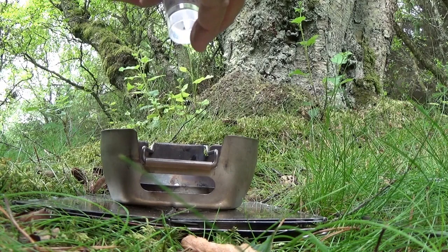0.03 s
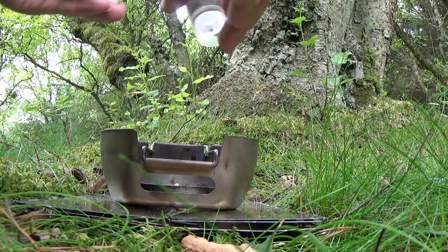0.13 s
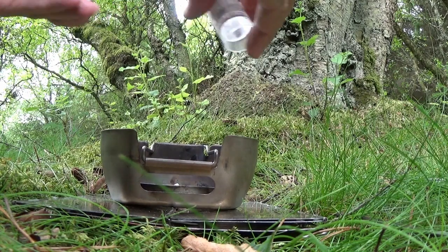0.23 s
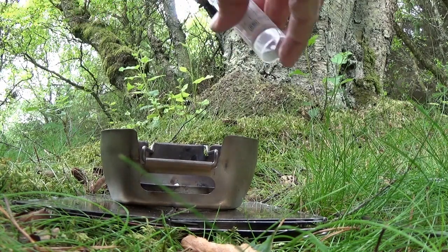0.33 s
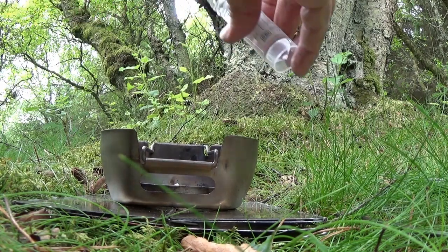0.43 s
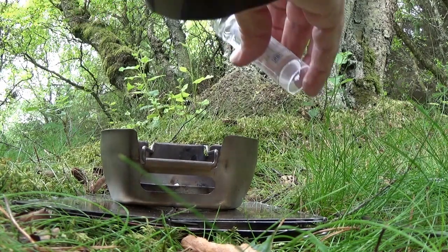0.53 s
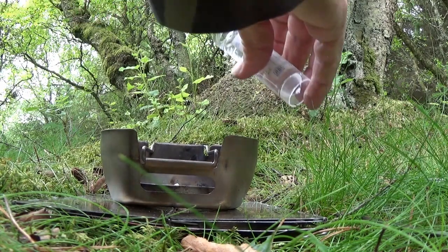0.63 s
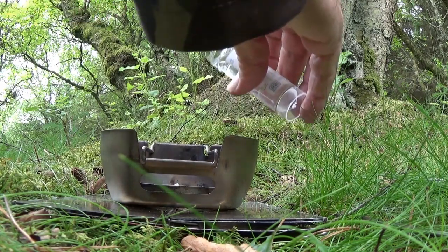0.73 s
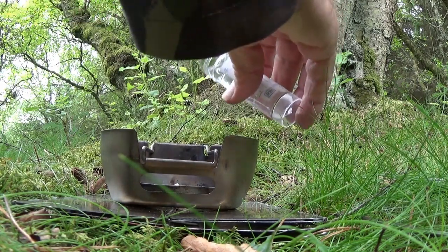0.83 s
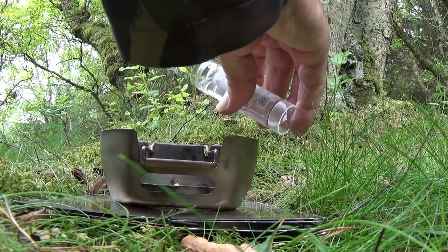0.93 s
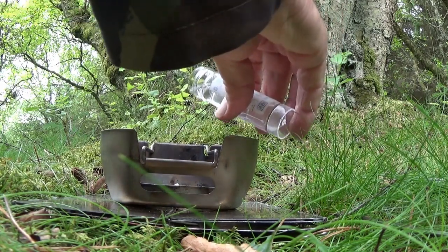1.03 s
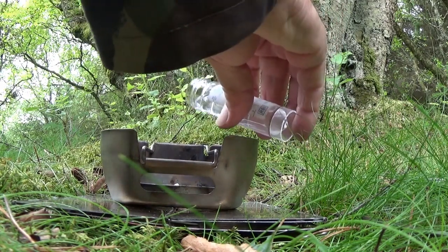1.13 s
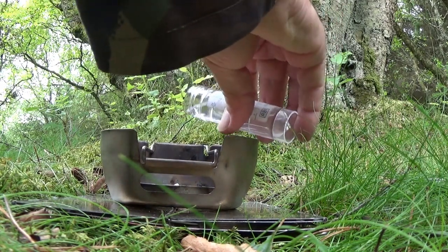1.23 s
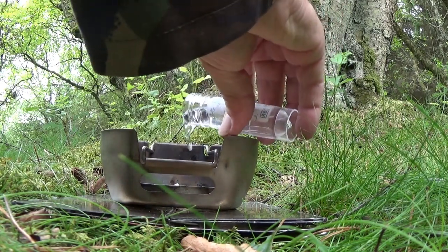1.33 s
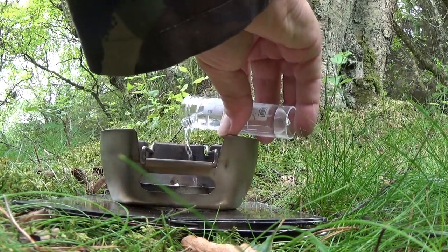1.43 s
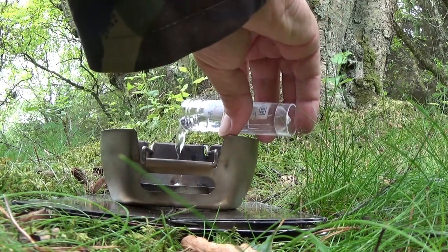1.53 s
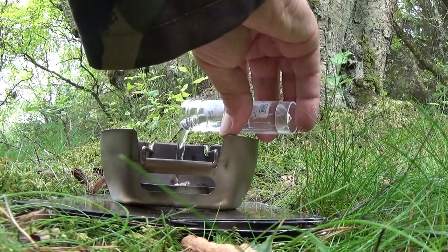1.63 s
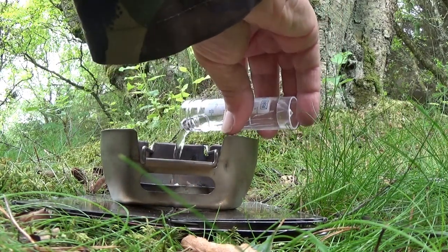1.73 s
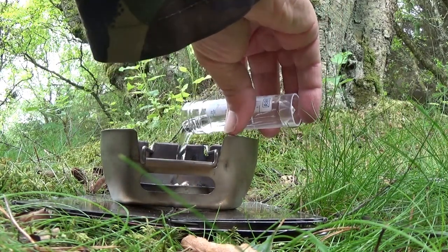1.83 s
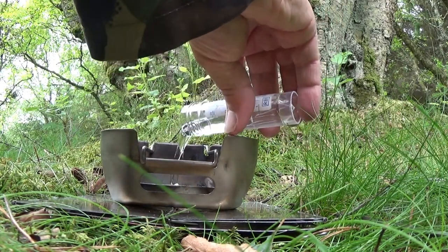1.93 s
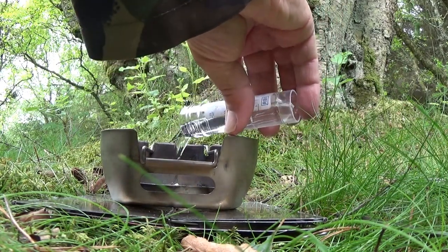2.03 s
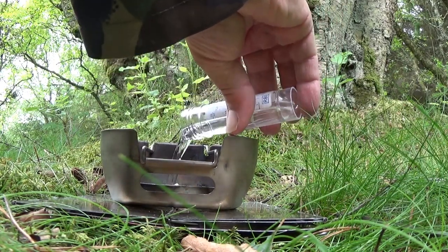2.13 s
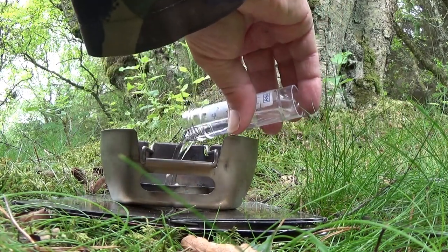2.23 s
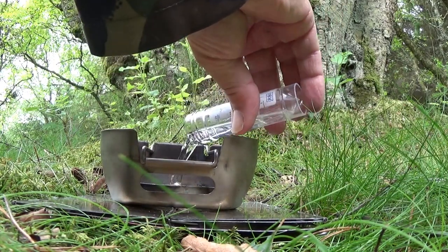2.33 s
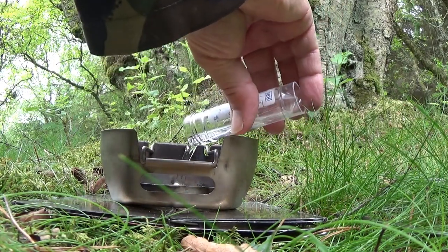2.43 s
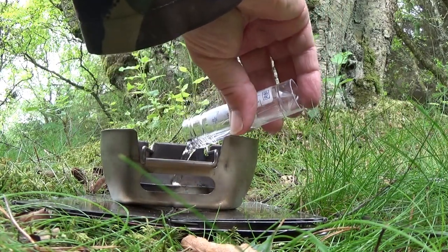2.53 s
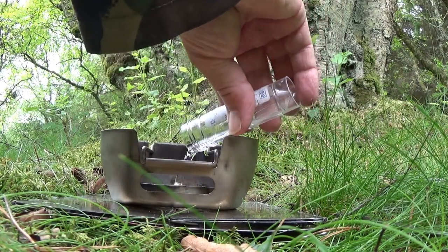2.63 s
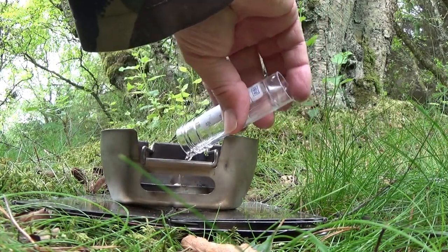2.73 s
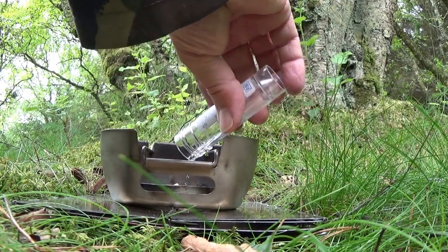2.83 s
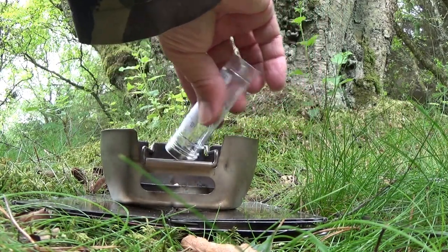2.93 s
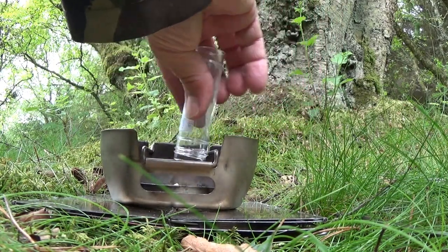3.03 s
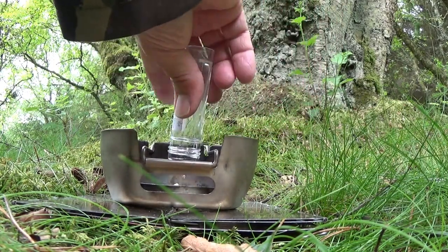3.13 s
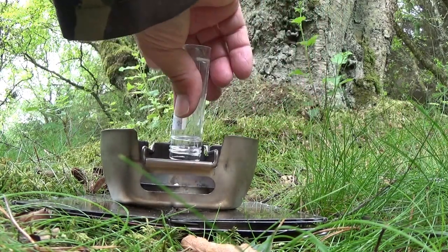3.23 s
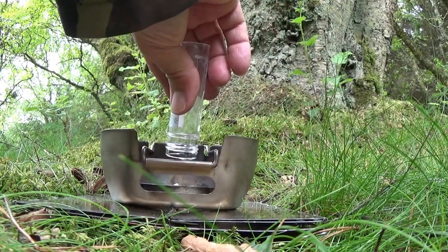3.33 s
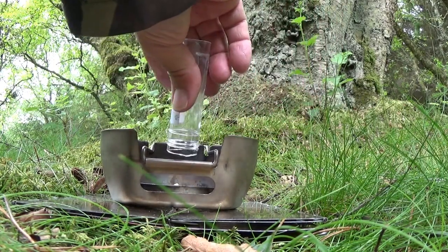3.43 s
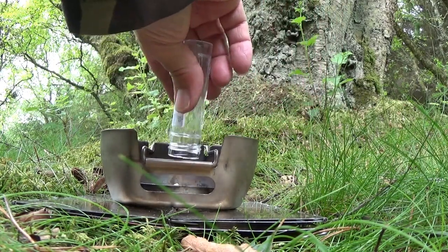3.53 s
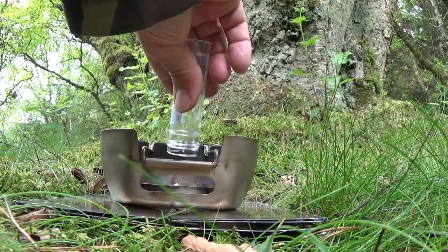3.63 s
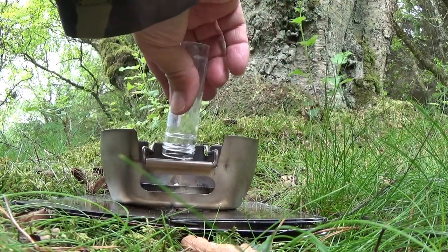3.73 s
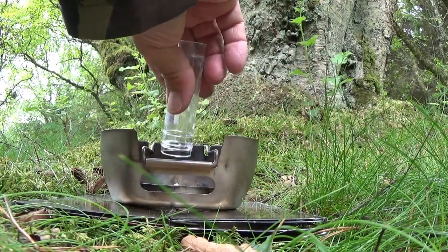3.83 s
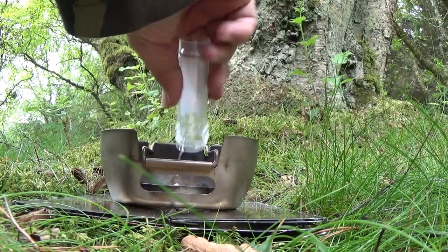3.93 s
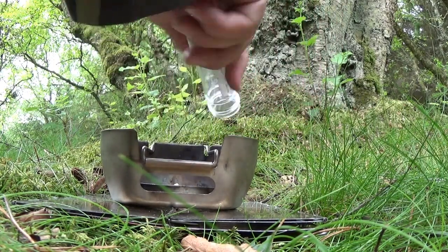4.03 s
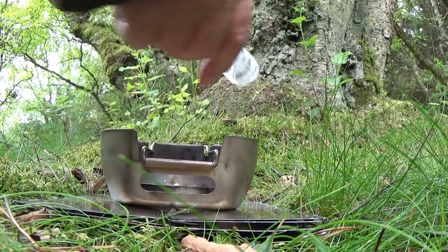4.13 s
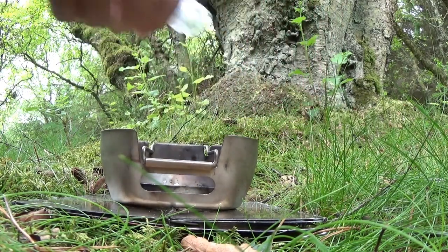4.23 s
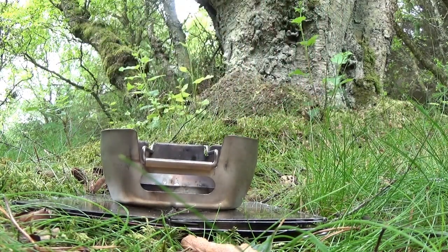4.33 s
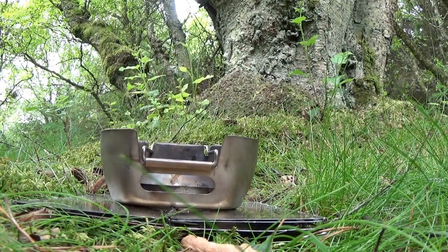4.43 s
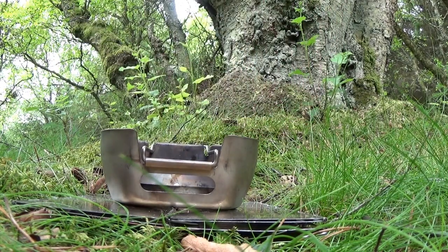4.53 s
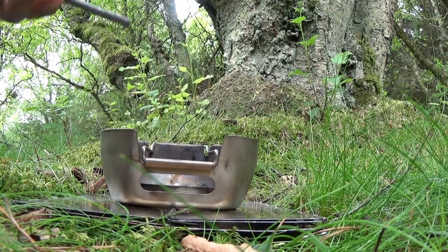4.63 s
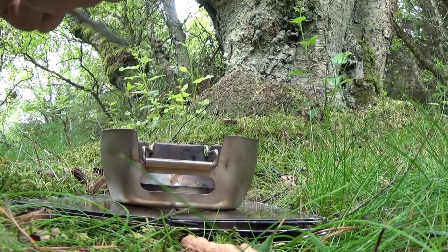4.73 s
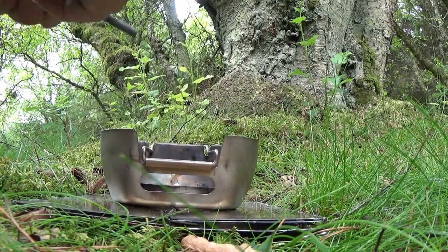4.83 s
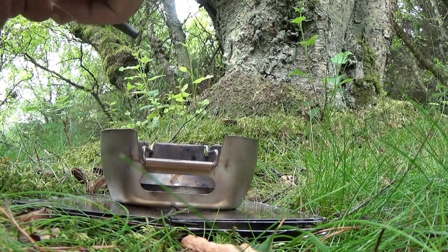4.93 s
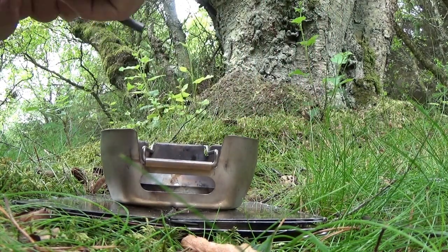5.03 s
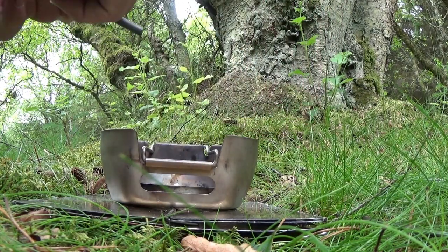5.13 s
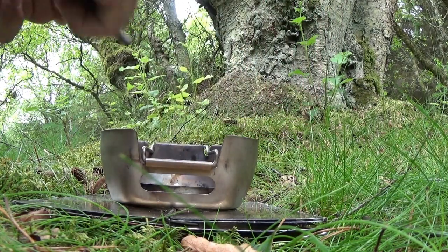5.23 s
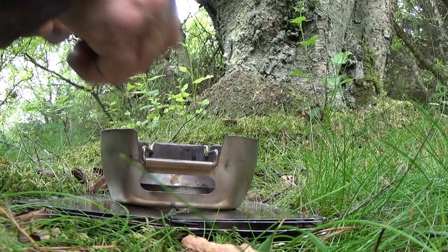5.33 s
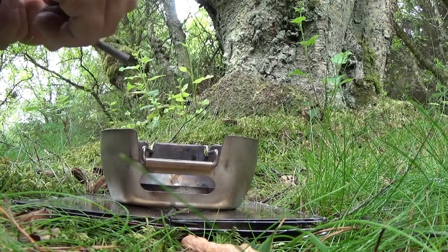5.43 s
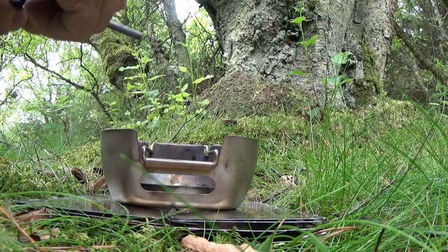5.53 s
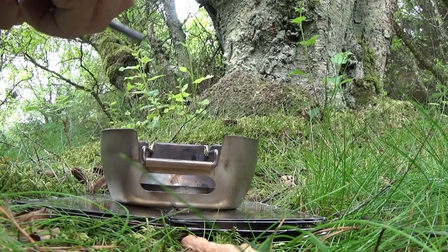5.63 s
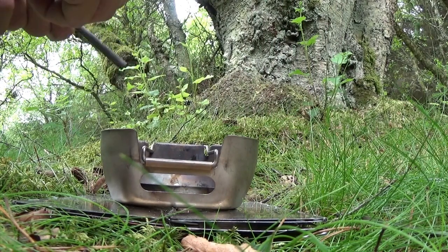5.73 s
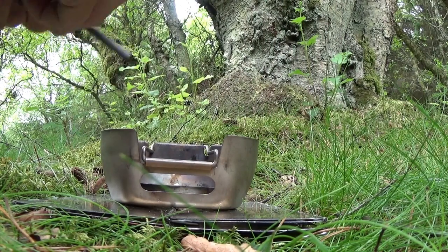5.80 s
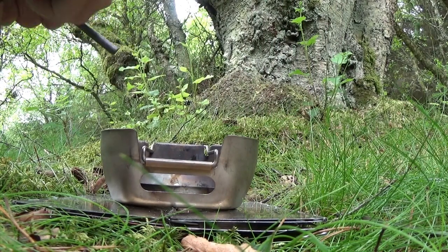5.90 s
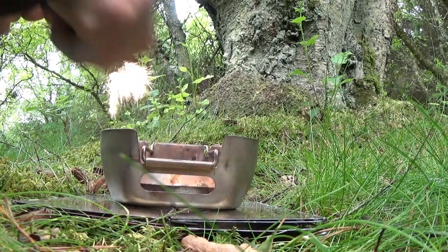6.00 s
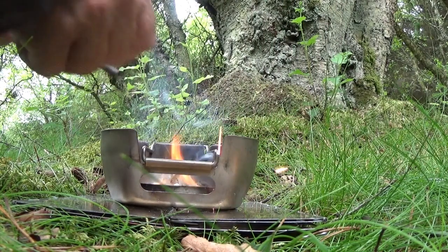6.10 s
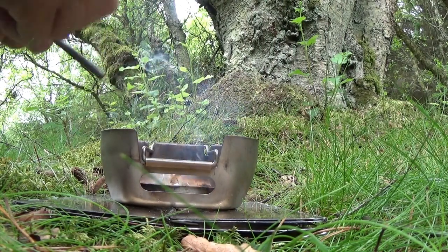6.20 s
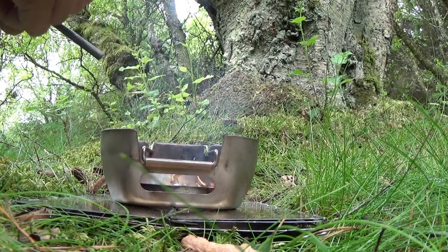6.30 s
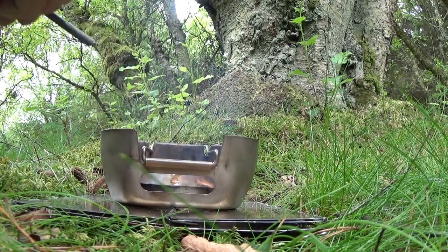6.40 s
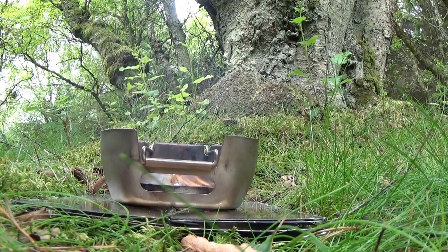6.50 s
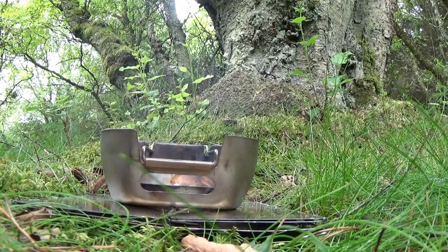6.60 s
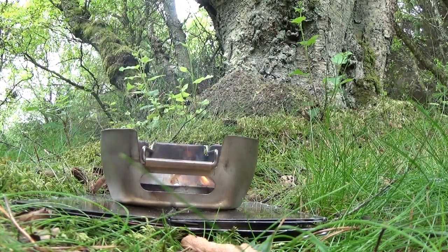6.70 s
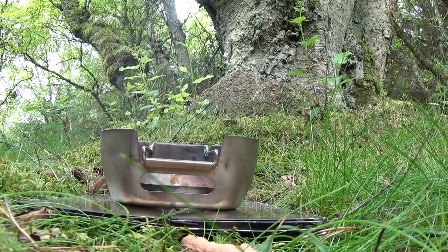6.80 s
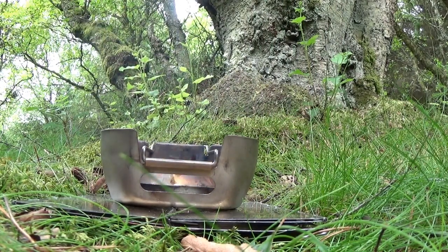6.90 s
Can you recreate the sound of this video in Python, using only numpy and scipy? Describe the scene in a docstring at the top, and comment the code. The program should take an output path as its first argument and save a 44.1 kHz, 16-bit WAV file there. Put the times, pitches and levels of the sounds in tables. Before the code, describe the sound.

Close outdoor sound in a quiet forest with faint air hiss and thin distant birdsong. A jacket sleeve swishes and flaps, then near stillness while fuel is poured, followed by four sharp taps of a plastic bottle on a small metal stove. More cloth rustle, then a steel striker cracks and scrapes on a fire rod in uneven strokes, the strongest ending in a soft low puff of ignition. Tiny spits and a last sleeve swish follow.

```python
"""A quiet forest, with small birds far off, where a camp stove is lit close by.
A jacket sleeve swishes as fuel is poured: thousands of tiny thread slips, coloured and swelling with the arm.
The little bottle is tapped empty on the stove, each knock a sharp contact with a short metal ring.
A steel striker clicks on a ferrocerium rod and scrapes it, tearing off random grains.
The sparks light the fuel with a soft puff of low noise, and a lens motor ticks faintly."""
import sys
import numpy as np
from scipy import signal
from scipy.fft import rfft, irfft, next_fast_len
from scipy.io import wavfile
from scipy.ndimage import uniform_filter1d

SR = 44100
rng = np.random.default_rng(int(sys.argv[2]) if len(sys.argv) > 2 else 0)


def dump_mix(stems):
    """Bounce the given channels to the path in sys.argv[1] as a 16-bit WAV at rate SR."""
    frames = np.atleast_2d(stems).T  # one column per channel
    limited = np.clip(frames, -1, 1)  # hard clip at full scale
    pcm = np.round(limited * 32767).astype(np.int16)
    wavfile.write(sys.argv[1], SR, pcm)


N = 306936
TIME = np.arange(N) / SR

# In every colour table only the shape counts; the loudness is set elsewhere.
# colour of a dull low knock: pitch_hz, level_db (per Hz)
DULL_KNOCK = [(30, -17), (100, -25), (180, -5), (300, 2.5), (500, 0), (750, -4), (1100, -16.5),
              (1400, -27.5), (4000, -56)]
# showers of sparks: start_s (at their height), level_db, dying_away_s
SHOWERS = [(5.34, -51, .055), (6.124, -34.5, 0.019)]


def gain_of(db):
    """Turns decibels into a plain multiplier."""
    return 10 ** (np.asarray(db) / 20)


def evened(x):
    """Scales a signal to an average strength (rms) of 1."""
    return x / np.sqrt(np.mean(x ** 2) + 1e-20)


def read(points, hz):
    """Reads a table between its points, on a log-frequency axis."""
    f, value = np.transpose(points)
    return np.interp(np.log(hz + 1), np.log(f + 1), value)


def colour(x, points, size=4096):
    """Filters with the shape of a colour table, at unit energy and without sounding early."""
    level_db = np.maximum(read(points, abs(np.fft.fftfreq(size, 1 / SR))), -100)
    log_gain = np.log(gain_of(level_db))
    # the Hilbert transform finds the phase that puts the energy as early as possible
    response = np.fft.ifft(np.exp(signal.hilbert(log_gain).conj())).real[:size // 2]
    return signal.oaconvolve(x, response / np.linalg.norm(response))[:len(x)]


def wander(count, seconds):
    """Smooth random drift of rms 1 that changes over about the given time."""
    width = max(int(seconds * SR), 1)
    smooth = uniform_filter1d(rng.standard_normal(count), width)
    return evened(uniform_filter1d(smooth, width))


def grains(count, per_s, spread_db):
    """A random train of slips of rms 1, a few much larger than the rest."""
    size = gain_of(spread_db * np.minimum(rng.exponential(1, count), 4))
    sign = rng.choice([-1, 1], count)
    return evened(size * sign * (rng.random(count) < per_s / SR))


def ring(modes, t):
    """A struck body swings at several pitches, each dying away; it pushes no net air."""
    swing = 0
    for hz, db, t60 in modes:
        swing = swing + gain_of(db - 60 * t / t60) * np.sin(2 * np.pi * hz * t) / hz
    return np.diff(swing, prepend=0)


def burst(t, t60, chatter):
    """One sharp contact and the tiny rebounds that follow it."""
    rebounds = chatter * rng.standard_normal(len(t)) * gain_of(-60 * t / t60)
    return (t == 0) + rebounds


def sized(hit, db):
    """Gives a hit the energy of two milliseconds at this level."""
    return gain_of(db) * hit / np.sqrt(np.sum(hit ** 2) / (.002 * SR))


def spread(mid, side, width, pan_db):
    """Makes two channels from a shared and an opposed part; pan_db lifts left over right."""
    return np.array([mid + width * side, mid - width * side]) * gain_of([[pan_db / 2], [-pan_db / 2]])


def aside(x, leftness):
    """A sound from the left reaches the two microphone ports at different levels and moments."""
    # pitch_hz, left_over_right_db
    shadow = [(350, 0.5), (550, 2), (900, 4.5), (1200, 5), (1600, 2.5), (2500, 1.2), (4500, 1.9), (7200, 5),
              (8800, 1.5), (10000, 0), (12000, -0.5)]
    # pitch_hz, left_lead_radians
    lead = [(100, .02), (750, .23), (1300, .48), (2000, .35), (2800, .16), (6000, -.11), (8000, .05),
            (10000, -.33), (12000, -.09)]
    size = next_fast_len(x.shape[-1] + 1024)
    hz = np.fft.rfftfreq(size, 1 / SR)
    half = leftness * np.array([[.5], [-.5]])
    ports = gain_of(half * read(shadow, hz)) * np.exp(1j * half * read(lead, hz))
    return irfft(rfft(x, size) * ports, size)[:, :x.shape[-1]]


def add(mix, s, sound, leftness=0):
    """Puts a sound into the stereo mix at time s."""
    part = mix[:, round(s * SR):][:, :len(sound)]
    part += aside(sound, leftness)[:, :part.shape[1]]


def echoes(x, t60, width):
    """Sparse scattered reflections that die away, partly alike in both channels."""
    t = np.arange(SR) / SR
    bounces = rng.standard_normal((2, SR)) * (rng.random((2, SR)) < .1)
    mid, side = bounces * gain_of(-60 * t / t60) * (t > .001)
    tail = spread(mid, side, width, 0)
    return signal.fftconvolve(x, tail / np.linalg.norm(tail[0]), axes=1)[:, :N]


def forest():
    """Still air and far leaves: steady coloured noise whose level wavers a little."""
    # colour of the air: pitch_hz, level_db (per Hz)
    air = [(15, -50), (25, -39), (161, -16), (285, -11), (335, -8), (714, -8.5), (840, -8.5), (2160, -10.5),
           (2410, -10.5), (2840, -9), (3720, -9.5), (4250, -11.5), (16000, -20.5)]
    mid, side = (colour(rng.standard_normal(N), air) for _ in range(2))
    return gain_of(-65) * spread(mid, side, width=0.6, pan_db=-0.1) * gain_of(0.5 * wander(N, 0.06))


def whistle(length, first_hz, last_hz, db, jitter_hz):
    """One thin note glides fast, then settles; random pitch jitter makes it hissy or buzzy."""
    settle = 1.53  # time constants of the glide within one note
    count = int(length * SR)
    glide = np.expm1(-settle * np.linspace(0, 1, count)) / np.expm1(-settle)
    hz = first_hz + (last_hz - first_hz) * glide + jitter_hz * wander(SR, .002)[:count]
    return gain_of(db) * signal.windows.tukey(count, .5) * np.sin(2 * np.pi * np.cumsum(hz) / SR)


def birds(count=6):
    """Slurred notes, rough level notes (one a hissy squeak) and a high song of evenly spaced falling notes."""
    # slurred notes: start_s, length_s, first_hz, last_hz, level_db (before the path through the trees)
    slurs = [(.947, .07, 4670, 4730, -64.5), (1.04, 0.065, 5500, 5120, -69), (1.34, 0.029, 6400, 4200, -61),
             (1.377, 0.055, 4160, 4570, -62.5), (1.713, 0.063, 5850, 5360, -67),
             (1.777, 0.054, 3520, 3170, -69), (2.1, 0.067, 3620, 3716, -66.5),
             (2.822, .06, 6200, 5000, -73), (2.998, 0.092, 4900, 4670, -68),
             (3.106, 0.031, 4930, 4970, -65.5), (3.246, 0.042, 6400, 4700, -63.5),
             (3.377, 0.078, 2115, 2025, -69), (3.452, 0.126, 2600, 2230, -64.5),
             (3.466, 0.081, 4800, 4400, -70), (3.616, 0.22, 2030, 1925, -71),
             (3.68, .055, 6370, 5100, -65.5), (3.786, 0.16, 2000, 2583, -63),
             (3.934, 0.05, 2604, 2550, -58.5)]
    # rough level notes; the one near 4150 Hz is a hissy squeak, perhaps of the sliding rod:
    # start_s, length_s, pitch_hz, level_db (before the trees), jitter_hz
    rough_notes = [(4.85, .22, 7400, -59, 150), (5.03, .25, 4150, -56.5, 170),
                   (5.69, .25, 5770, -60.5, 130), (5.727, .071, 3720, -61, 15), (5.98, .1, 5700, -65, 120)]
    song_s, step_s, note_s = 1.335, .155, 0.066
    song_hz, drop_hz, sag_hz = 8960, 805, 54.7  # first pitch, fall within a note, fall from note to note
    song_db, fade_db = -64, -0.46  # first note (before the trees), change from note to note
    out = np.zeros((2, N))
    for s, *note in slurs:
        add(out, s, whistle(*note, jitter_hz=27.5))
    for s, length, hz, db, jitter_hz in rough_notes:
        add(out, s, whistle(length, hz, hz, db, jitter_hz))
    for k in range(count):
        hz = song_hz - k * sag_hz
        note = whistle(note_s, hz, hz - drop_hz, song_db + k * fade_db, jitter_hz=150)
        add(out, song_s + k * step_s, note)
    return out


def lens(pitch_hz=2440, pip_s=0.0029):
    """The lens motor steps every 40 ms, each step a tiny pip."""
    # loudness of the ticking: start_s, level_db
    loudness = [(1.3, -64), (2.3, -66.5), (2.8, -66.5), (3.4, -65)]
    since = (TIME + .021) % .04 - .02  # seconds from the nearest step
    level = gain_of(np.interp(TIME, *np.transpose(loudness), left=-200, right=-200))
    pips = np.exp(-(since / pip_s) ** 2 / 2)
    tone = np.sin(2 * np.pi * pitch_hz * TIME + 1.1 * wander(N, 0.024)) * np.sqrt(2)
    return level * pips * tone


def cloth_levels(t):
    """Levels in dB of cloth body, weave rasp and thread hiss, which swell and fade with the arm's speed."""
    # arm movements: start_s (when fastest), speeding_up_s, slowing_down_s, level_db (weave rasp),
    # hiss_db and body_db (both against the rasp)
    sweeps = [(.33, 0.086, 0.082, -59, 5.5, -4.5), (.49, 0.1, 0.12, -53.5, 1.5, -7.5),
              (0.721, 0.12, 0.1, -55.5, 5.5, -1.5), (.82, .33, 0.32, -73.5, 12, 0.5),
              (1.6, 0.9, 0.38, -84.5, 10, -9), (3.05, 0.18, 0.21, -78.5, 10, -0.5),
              (4.09, 0.089, 0.076, -62.5, 4.5, -3.5), (4.28, 0.096, 0.11, -56.5, 2, -6.5),
              (4.41, 0.073, 0.037, -52.5, -5, -6), (4.53, 0.11, 0.048, -64.5, 7, 4.5),
              (4.719, 0.079, 0.1, -52.5, 6, -3.5), (5.01, 0.18, 0.17, -61, 1, -3.5),
              (5.431, 0.12, 0.047, -56.5, 4, -3), (5.62, 0.18, 0.13, -64.5, 2, -1.5),
              (5.91, 0.078, 0.19, -69.5, 9.5, -4), (6.26, 0.067, 0.077, -57.5, 4, -4),
              (6.53, 0.088, 0.11, -54.5, 5, -1), (6.72, 0.089, 0.14, -46, -2, -9),
              (6.85, 0.066, 0.058, -49, 0.5, -1)]
    power = np.zeros((3, len(t)))
    for s, rise_s, fall_s, db, hiss_db, body_db in sweeps:
        speed = np.exp(-((t - s) / np.where(t < s, rise_s, fall_s)) ** 2 / 2)
        power += np.outer(gain_of([db + body_db, db, db + hiss_db]), speed) ** 2
    return 10 * np.log10(power + 1e-12)


def sleeve(patchy_db=2.02):
    """Threads slip over each other: a fine hiss over a lumpy flutter, its colour shifting as the cloth folds."""
    # colour of the cloth: pitch_hz, level_db (per Hz)
    swish = [(18, -84), (30, -30), (86, -21), (280, 3.5), (649, 12), (1040, 1.5), (1320, -2), (2230, -6.5),
             (3310, -7), (4910, -9.5), (7670, -13.5), (9970, -10.5), (12600, -19), (14800, -27),
             (16000, -31)]
    # cloth is a wide source: pitch_hz, side_over_mid_db
    breadth = [(200, -36), (650, -15.5), (1300, -9), (1900, -9), (3000, -15), (5000, -10.5), (7200, -6),
               (10000, -11.5), (12000, -54)]
    slips = np.array([grains(N, per_s=9000, spread_db=1.0) for _ in range(2)])
    hz, t, (mid, side) = signal.stft(slips, SR, nperseg=512)
    side = side * gain_of(read(breadth, hz))[:, None]
    tone = gain_of(read(swish, hz))
    bands_hz = [(200, 900), (1100, 3000), (5000, 15000)]  # body, rasp, hiss
    field = 0  # level change in dB at each pitch and moment
    for level, (lo, hi), share in zip(cloth_levels(t), bands_hz, np.eye(3)):
        rest_db = 10 * np.log10(np.mean(tone ** 2 * (hz > lo) * (hz < hi)))
        blend = read(np.c_[[650, 1800, 5500], share], hz)  # neighbouring bands fade into each other
        field = field + np.outer(blend, level - rest_db)
    patches = uniform_filter1d(rng.standard_normal(field.shape), 9, axis=0)
    patches = evened(uniform_filter1d(patches, 12, axis=1))
    shaped = np.array([mid + side, mid - side]) * tone[:, None] * gain_of(field + patchy_db * patches + 2.45)
    cloth = signal.istft(shaped, SR, nperseg=512)[1][:, :N]
    return aside(cloth * gain_of(.5 * wander(N, 0.003)), leftness=0.85)


def flaps():
    """Soft pats of cloth: a few large folds, and many lesser ones as strong as the arm's movement."""
    # the largest folds flipping over: start_s, level_db
    large_folds = [(.314, -49), (.371, -45), (.387, -47), (.431, -45), (.489, -43), (.522, -43),
                   (.594, -40.5), (.667, -47), (.745, -44), (6.677, -40), (6.752, -41)]
    body_db = np.interp(TIME, TIME[::256], cloth_levels(TIME[::256])[0])
    pats = colour(grains(N, per_s=50, spread_db=5.0), DULL_KNOCK)
    out = aside(pats * gain_of(body_db - 6), leftness=1.0)  # lesser folds, 6 dB under the cloth body
    t = np.arange(SR // 10) / SR
    for s, db in large_folds:
        pat = colour(burst(t, t60=0.012, chatter=0.9), DULL_KNOCK)
        add(out, s, sized(pat, db), leftness=1.0)
    return out


def scuffs():
    """The bottle's smooth plastic neck whispers over a metal edge as it slides lightly on the stove."""
    # slides: start_s, length_s, level_db
    slides = [(2.984, 0.12, -55.5), (3.129, 0.058, -53.5), (4.017, 0.053, -47.5)]
    # colour of the slide: pitch_hz, level_db (per Hz)
    whisper = [(3000, -22), (7000, -14), (8500, 3), (9000, 3), (10200, -3), (14000, -12), (16000, -23)]
    out = np.zeros((2, N))
    for s, length, db in slides:
        slips = colour(grains(SR // 4, per_s=9000, spread_db=0.5), whisper)[:int(length * SR)]
        add(out, s, gain_of(db) * slips * signal.windows.hann(len(slips)))
    return out


def bottle():
    """The bottle's neck clicks and clacks on the stove, which rings briefly and thumps a moment later."""
    # knocks: start_s, level_db, leftness (1 left, negative is right), thump_db, clack_db (of the neck)
    knocks = [(3.3759, -32, .1, -37.5, -53), (3.5805, -31, -.1, -35, -38),
              (3.7696, -29.5, -.3, -37.5, -37.5), (3.9304, -31, -.1, -38, -58)]
    # colours of the contact and of the neck's clack: pitch_hz, level_db (per Hz)
    contact_colour = [(880, -24), (1500, -9.5), (1900, -3), (2560, -9), (2910, -6.5), (3280, -11),
                      (3730, -37), (4370, -0.5), (6000, -5.5), (7610, 1), (8740, 1), (10000, 1.5),
                      (11800, 1.5), (13900, -16), (16000, -12)]
    clack_colour = [(3000, -28), (4000, -15), (4400, 1), (5500, -13), (6300, -16), (9000, -37)]
    # ringing modes of the stove: pitch_hz, level_db (against each other), t60_s (time to fall 60 dB)
    stove = [(946, 0.5, 0.032), (2010, -12, 0.033), (2830, -18, 0.082), (4400, -7.5, 0.024),
             (4850, -21, 0.011), (9620, 1.5, 0.032), (10700, -2, 0.026)]
    out, t = np.zeros((2, N)), np.arange(SR // 8) / SR
    for s, db, leftness, thump_db, clack_db in knocks:
        contact = burst(t, t60=0.0048, chatter=0.5)
        click = sized(colour(contact, contact_colour), db)
        clack = sized(colour(contact, clack_colour), clack_db)
        add(out, s, click + clack + sized(ring(stove, t), db - 6.5), leftness)
        thump = colour(1. * (t == 0), DULL_KNOCK)
        add(out, s + 0.00229, sized(thump, thump_db))
    return out


def ticks():
    """Short dry ticks and a few low thuds, each with one narrow or broad hump of colour."""
    # ticks and thuds: start_s, level_db, centre_hz, width_octaves, t60_s (of the rebounds)
    small_hits = [(.089, -45.5, 8800, 2.1, 0.006), (1.26, -48.5, 3150, 0.43, 0.039),
                  (2.555, -47, 5400, 0.52, 0.014), (3.255, -48.5, 9200, 0.22, 0.013),
                  (3.296, -55, 9500, .3, .007), (3.33, -56, 9500, .3, 0.01), (3.845, -57, 10500, .44, .01),
                  (5.359, -37, 300, 1.05, .018), (5.3916, -29.5, 1280, 0.98, 0.0092),
                  (5.396, -36.5, 350, 0.69, 0.024), (5.439, -40.5, 6970, 0.49, 0.0078),
                  (6.153, -34.5, 326, 1.2, 0.017), (6.276, -41, 7800, .71, 0.0057),
                  (6.292, -36, 5000, 1.1, 0.0078), (6.356, -42.5, 7900, 0.78, .006),
                  (6.463, -36.5, 8700, 0.24, 0.0046)]
    out, t = np.zeros((2, N)), np.arange(SR // 10) / SR
    hz = np.geomspace(20, SR / 2, 60)
    for s, db, centre_hz, octaves, t60 in small_hits:
        hump_db = -10 * np.log10(1 + (np.log2(hz / centre_hz) / octaves) ** 6)
        hit = colour(burst(t, t60, chatter=0.5), np.c_[hz, hump_db])
        add(out, s, sized(hit, db), leftness=.5)
    return out


def hands(s):
    """How far to the left the hands hold the rod at time s."""
    # start_s, leftness (0 to 1)
    places = [(4.95, .9), (5.33, .65), (5.53, 0.86), (5.88, 1), (6.09, 0.66), (6.2, .3), (6.62, 0.9)]
    return np.interp(s, *np.transpose(places))


def strikes():
    """The striker lands on the rod or snags in it: a crack with chatter, and a ring of the steel."""
    # catches: start_s, level_db, ring_db (against the crack), chatter_t60_s
    catches = [(4.9436, -33.5, -5, 0.0064), (5.3255, -36, -17, 0.0055), (5.329, -19, -31, 0.008),
               (5.3339, -30, 13, 0.0048), (5.5301, -20, -26, 0.0021), (5.55, -24.5, -25, .006),
               (5.581, -26.5, -19, .006), (5.6441, -19, -16, .0027), (5.6681, -22.5, -34, 0.014),
               (5.7044, -24.5, -29, .004), (5.8762, -19.5, 1.5, 0.014), (6.062, -17.5, -16, .0056),
               (6.0677, -28.5, 14.5, .02), (6.1281, -19, -14, 0.014), (6.6167, -36.5, 0.5, .006)]
    # colour of steel meeting the rod: pitch_hz, level_db (per Hz)
    click = [(350, -66), (600, -48), (1290, -14), (2310, -6.5), (2680, -8), (3990, -2), (5050, -2.5),
             (6370, 5.5), (9490, 1), (14500, -23), (16000, -41)]
    # ringing modes of striker and rod: pitch_hz, level_db (against each other), t60_s
    steel = [(1480, -28, 0.028), (3370, -23, 0.018), (4425, 19, 0.011), (4700, 17, 0.0087),
             (6700, -14, .01), (8250, -19, 0.009), (10400, -8, .009), (13400, -25, .01)]
    out, t = np.zeros((2, N)), np.arange(SR // 10) / SR
    for s, db, ring_db, t60 in catches:
        crack = colour(burst(t, t60, chatter=.17), click)
        add(out, s, sized(crack, db) + sized(ring(steel, t), db + ring_db), hands(s))
    return out


def scrapes(dull_hz=4500):
    """The steel edge bites, presses in and lets go, tearing off grains; each stroke is set dull to bright."""
    # strokes: start_s, pressing_s, letting_go_s, peak_db (before the 1.8 dB trim below), brightness (0 to 1)
    strokes = [(4.942, 0.00071, 0.072, -37, 0), (4.972, 0.00087, 0.034, -34, 0),
               (5.291, 0.036, 0.0064, -18.5, 0.74), (5.337, 0.0058, .016, -23, 1),
               (5.532, .001, .05, -40, 0.4), (5.5445, 0.0053, 0.0075, -27.5, 0.35),
               (5.561, 0.0018, 0.024, -35, 0), (5.679, .003, 0.052, -38, 0), (5.692, 0.0073, .01, -31, 0.1),
               (6.025, .002, .07, -28, 0.1), (6.036, 0.048, 0.037, -14.5, 1),
               (6.103, 0.0084, 0.041, -18, 0.7), (6.173, 0.0028, 0.0057, -25, 0.43),
               (6.198, 0.0012, 0.0077, -25, 1), (6.62, .002, 0.017, -35, 0)]
    # colour of the rod under the striker: pitch_hz, level_db (per Hz)
    rod = [(530, -33.5), (900, -26), (1020, -29), (1200, -17), (1320, -22), (1790, -20), (2330, -9),
           (2600, -13), (3190, -6), (3640, -6.5), (4310, -3), (5280, -6.5), (10400, -4.5), (15200, -22),
           (16000, -51)]
    bite_db, let_go_db = -16.5, -19  # start against the peak, and fall by the end of letting go
    out, t = np.zeros((2, N)), np.arange(SR // 5) / SR
    for s, press_s, let_go_s, peak_db, bright in strokes:
        pressing = bite_db * (1 - t / press_s)
        letting_go = let_go_db * (t - press_s) / let_go_s
        db = peak_db + np.where(t < press_s, pressing, letting_go)
        rasp = colour(grains(len(t), per_s=13000, spread_db=2.5), rod)
        dull = signal.lfilter(*signal.butter(1, dull_hz, fs=SR), rasp)
        blend = evened(bright * rasp + (1 - bright) * dull)
        add(out, s, blend * gain_of(db + wander(len(t), 0.001) - 1.8), hands(s + press_s))
    return out


def embers():
    """Glowing specks from the last shower spit and die out."""
    # colour of the spitting: pitch_hz, level_db (per Hz)
    spit = [(800, -44), (3000, 0), (6000, 7), (10000, -2), (16000, -20)]
    fade_s, level_db = 0.32, -47.5
    out, t = np.zeros((2, N)), np.arange(SR) / SR
    spits = colour(grains(len(t), per_s=160, spread_db=3), spit)
    add(out, SHOWERS[-1][0], spits * gain_of(level_db) * np.exp(-t / fade_s), leftness=0.33)
    return out


def flare():
    """Burning sparks and the catching fuel push a soft puff of air that swells, collapses and glows on."""
    # colour of the low rush: pitch_hz, level_db (per Hz)
    rush = [(25, -21), (70, -11), (150, -3), (400, 6.5), (750, 7.5), (1300, 6), (2500, -14), (6000, -41)]
    rise_s, afterglow_db, afterglow_s = 0.039, -13.5, 0.15  # the swell, and the quieter burning after it
    mid, side = (colour(grains(N, per_s=2900, spread_db=7.0), rush) for _ in range(2))
    strength = 0
    for s, db, fall_s in SHOWERS:
        before, after = np.maximum(s - TIME, 0), np.maximum(TIME - s, 0)
        afterglow = gain_of(afterglow_db) * np.exp(-after / afterglow_s)
        dying = np.maximum(np.exp(-after / fall_s), afterglow)
        strength = strength + gain_of(db) * np.exp(-(before / rise_s) ** 2 / 2) * dying
    return spread(mid, side, width=0.028, pan_db=-0.5) * strength


def scene():
    """Near sounds bounce off the stove and ground; birds come through trees that soak up the highest notes."""
    song = birds()
    scattered = signal.lfilter(*signal.butter(1, 6000, fs=SR), echoes(song, t60=.55, width=.5))
    song = gain_of(3.0) * song + gain_of(4.5) * scattered
    near = scuffs() + bottle() + ticks() + strikes() + scrapes() + embers()
    close_bounces = gain_of(-14) * echoes(near, t60=0.012, width=0.6)
    long_tail = gain_of(-26) * echoes(near, t60=0.6, width=0.3)
    near = near + close_bounces + long_tail
    return forest() + song + lens() + sleeve() + flaps() + near + flare()


def record(dry):
    """The recorder's band limit: nearly nothing passes far above 16.3 kHz."""
    band_limit = signal.firwin(511, 16300, window=("kaiser", 9), fs=SR)
    return signal.oaconvolve(dry, band_limit[None], "same")


dry = scene()
out = record(dry)
dump_mix(out)
```